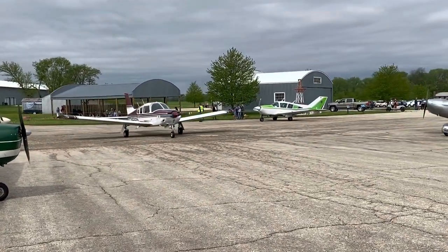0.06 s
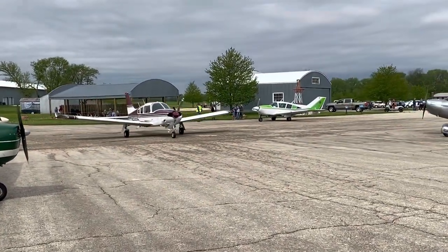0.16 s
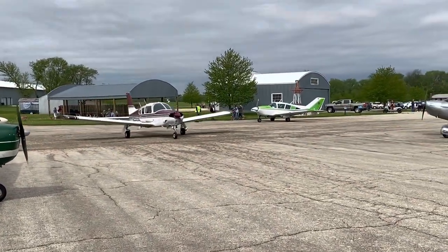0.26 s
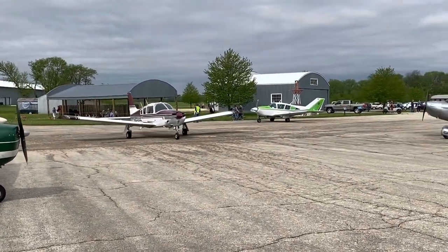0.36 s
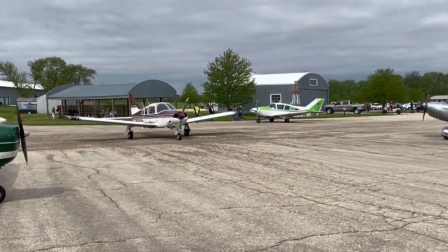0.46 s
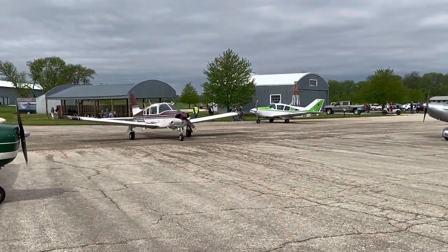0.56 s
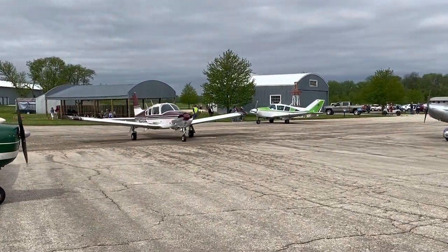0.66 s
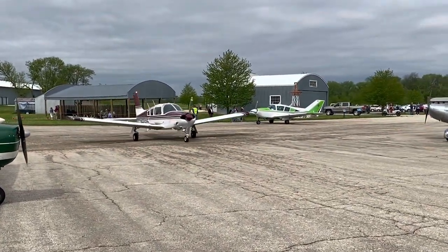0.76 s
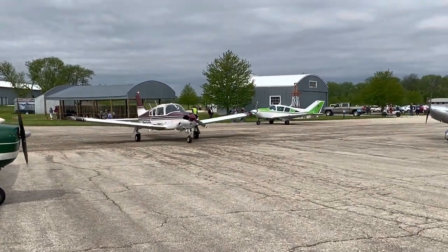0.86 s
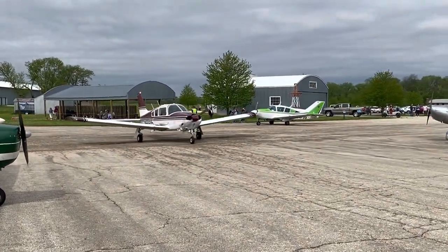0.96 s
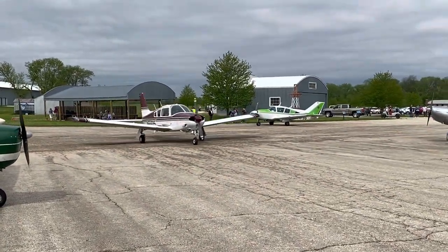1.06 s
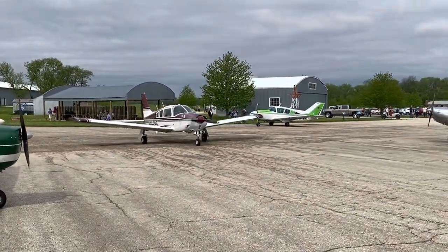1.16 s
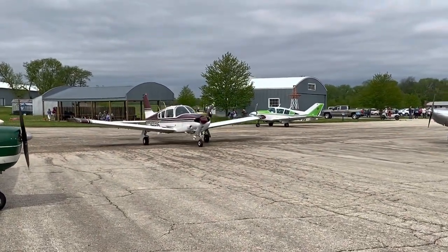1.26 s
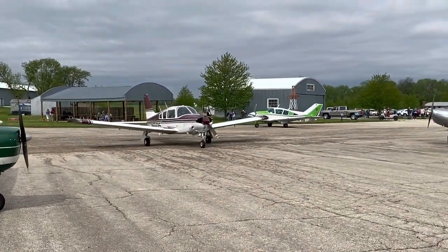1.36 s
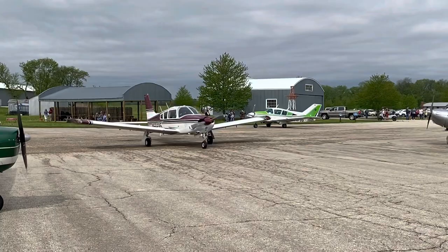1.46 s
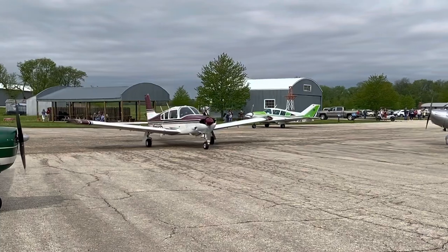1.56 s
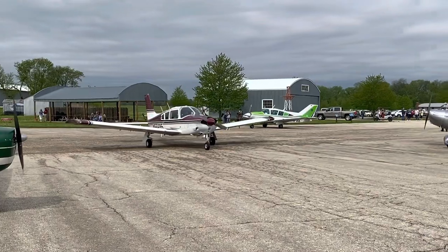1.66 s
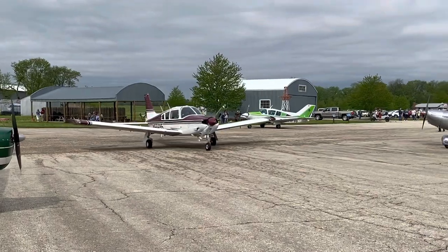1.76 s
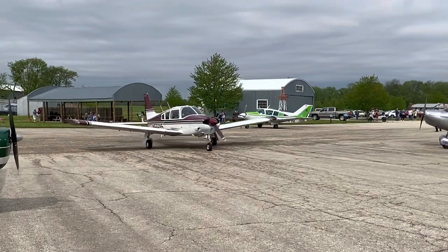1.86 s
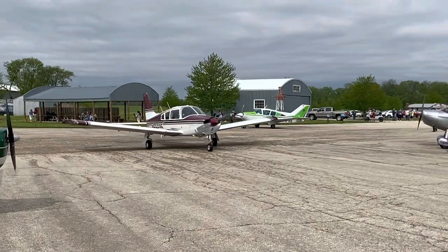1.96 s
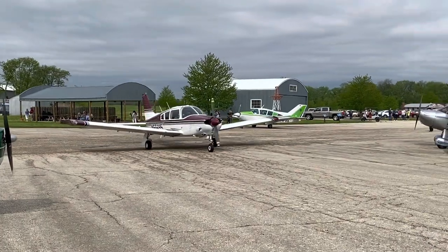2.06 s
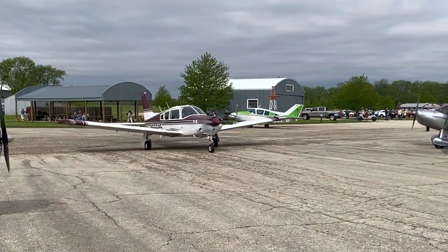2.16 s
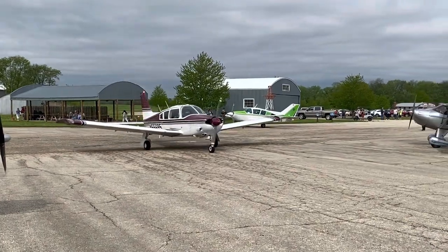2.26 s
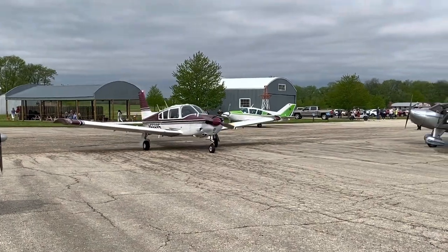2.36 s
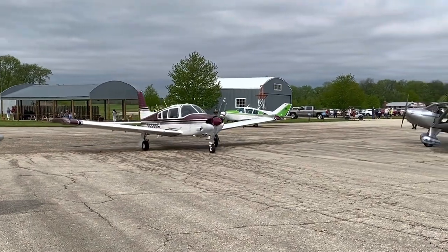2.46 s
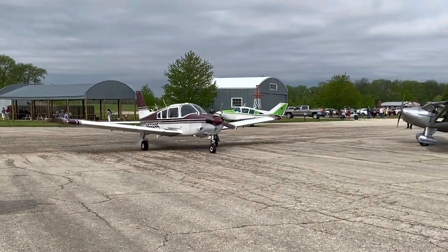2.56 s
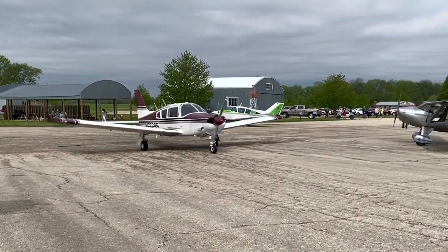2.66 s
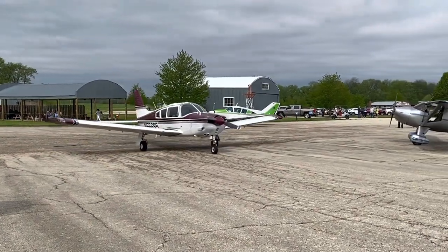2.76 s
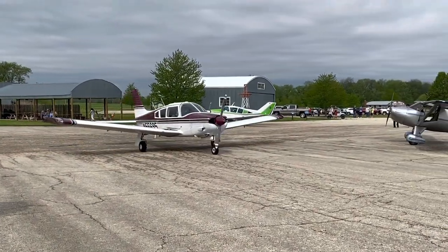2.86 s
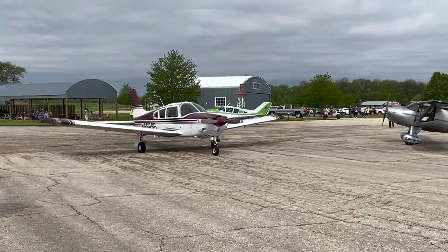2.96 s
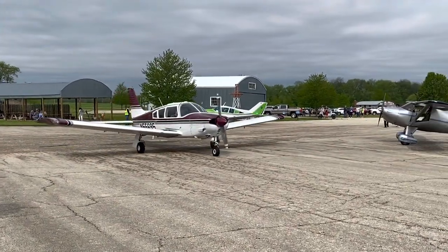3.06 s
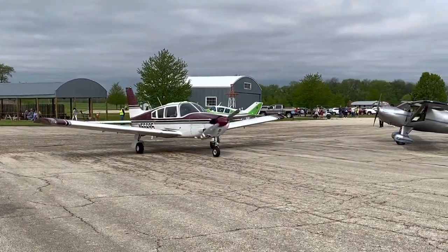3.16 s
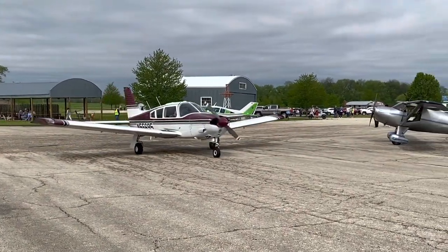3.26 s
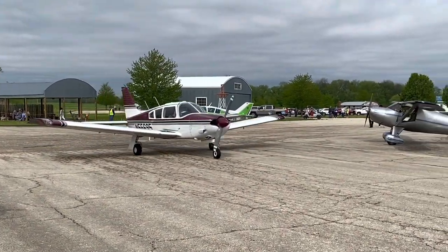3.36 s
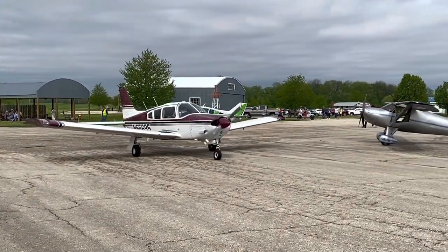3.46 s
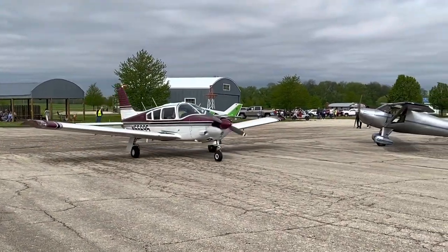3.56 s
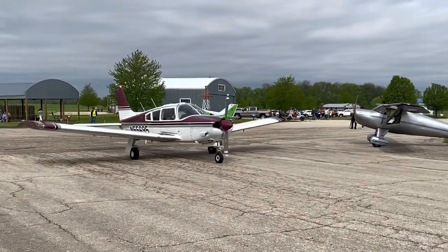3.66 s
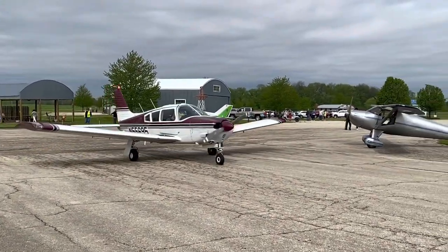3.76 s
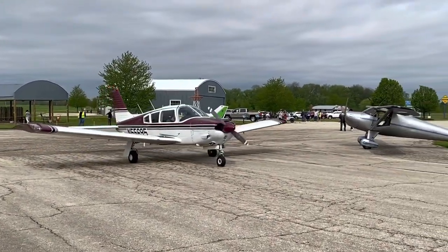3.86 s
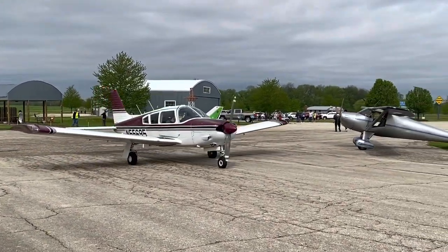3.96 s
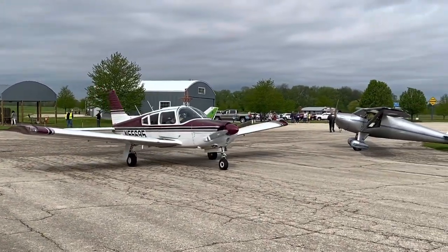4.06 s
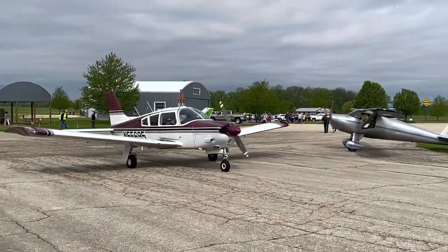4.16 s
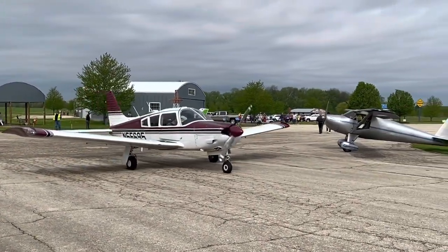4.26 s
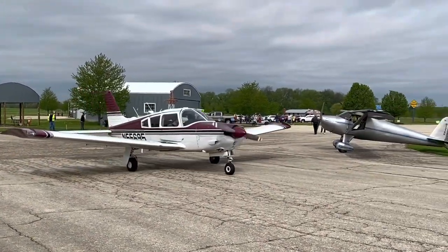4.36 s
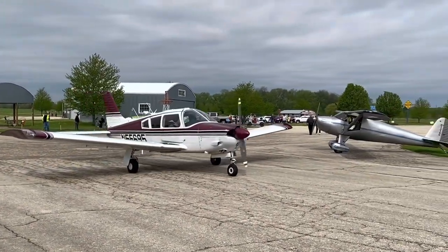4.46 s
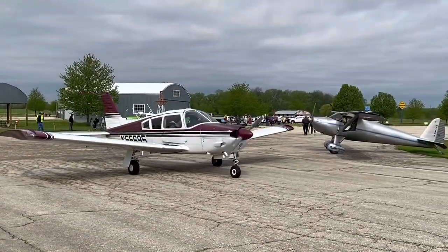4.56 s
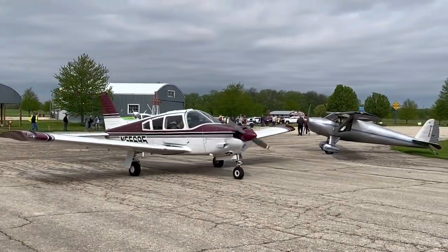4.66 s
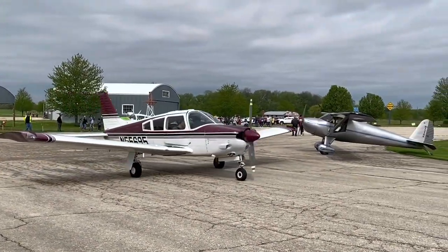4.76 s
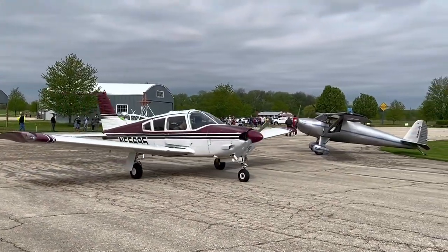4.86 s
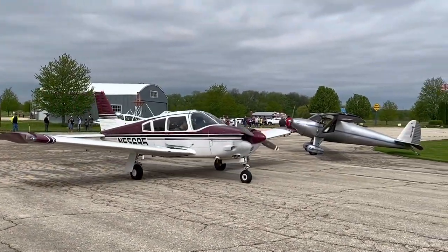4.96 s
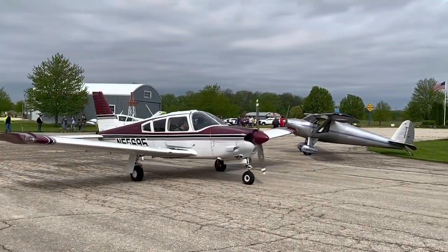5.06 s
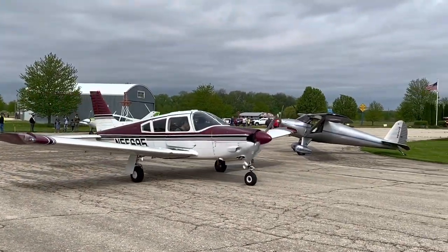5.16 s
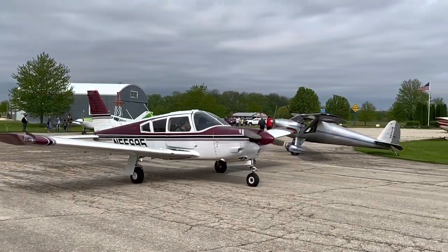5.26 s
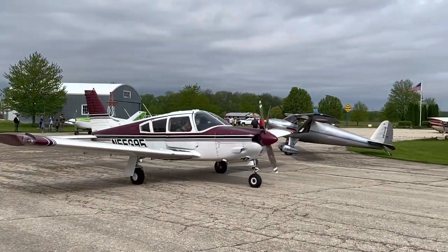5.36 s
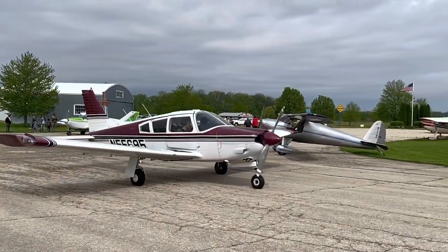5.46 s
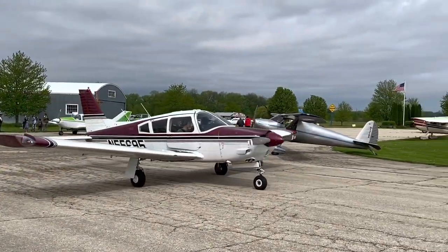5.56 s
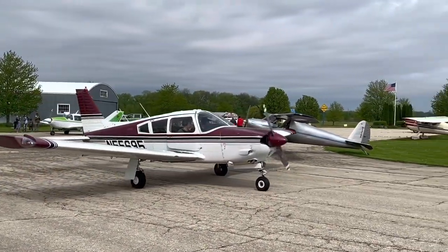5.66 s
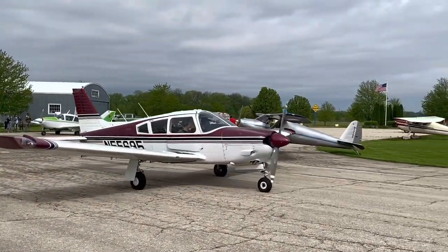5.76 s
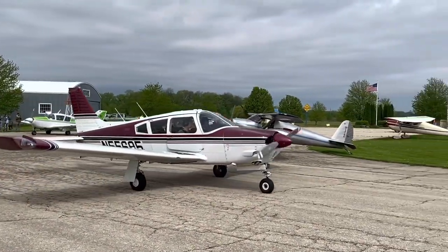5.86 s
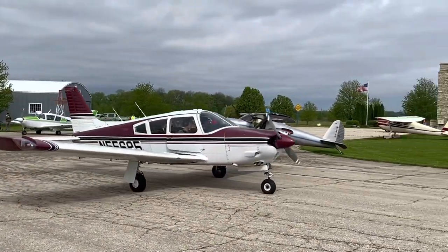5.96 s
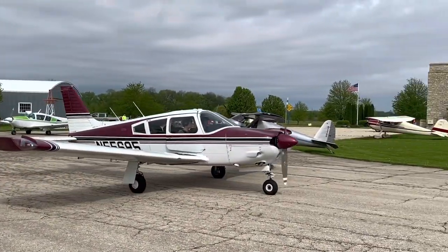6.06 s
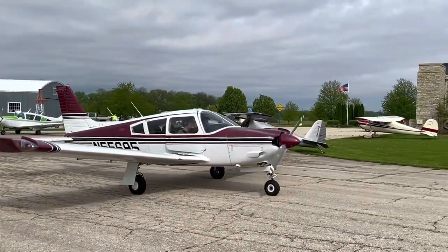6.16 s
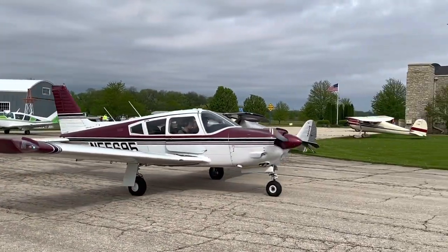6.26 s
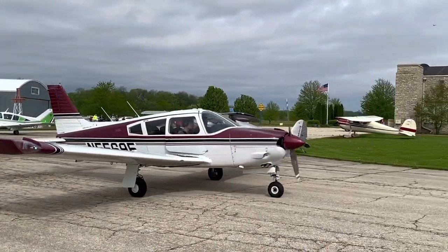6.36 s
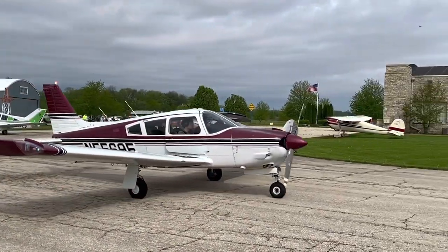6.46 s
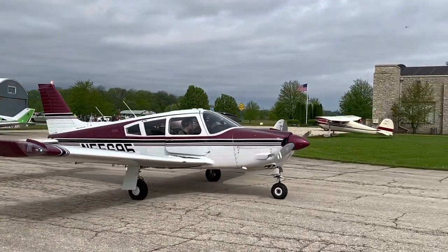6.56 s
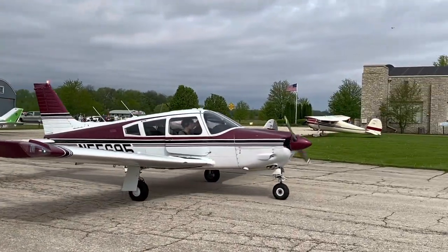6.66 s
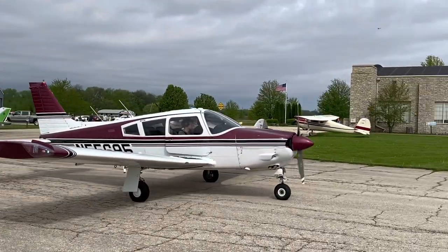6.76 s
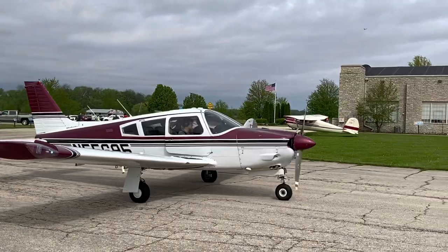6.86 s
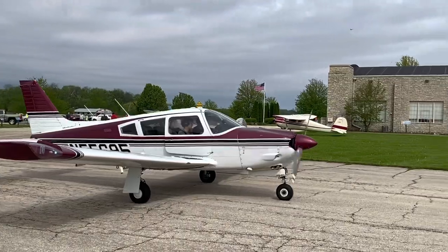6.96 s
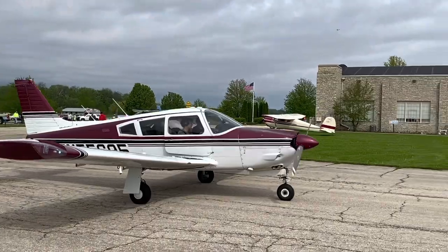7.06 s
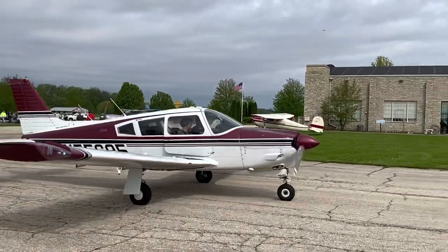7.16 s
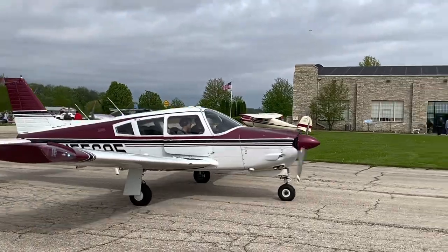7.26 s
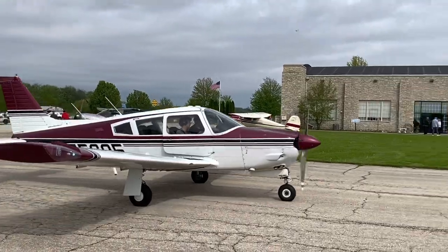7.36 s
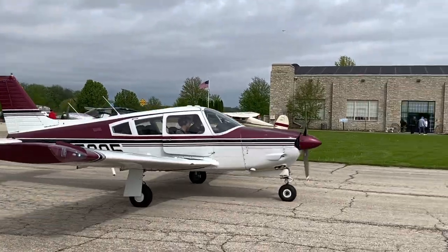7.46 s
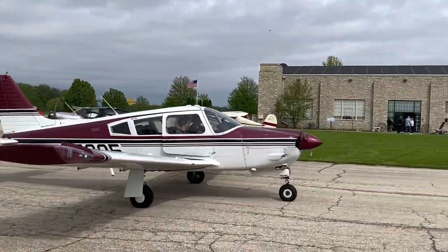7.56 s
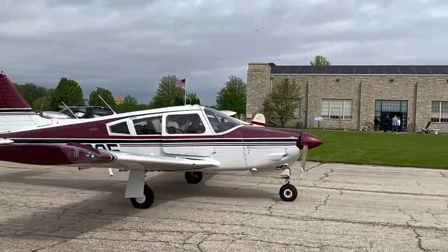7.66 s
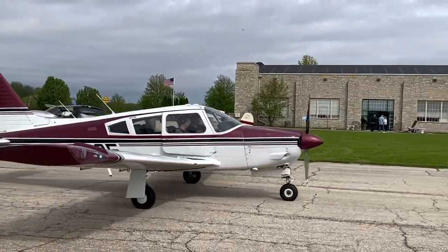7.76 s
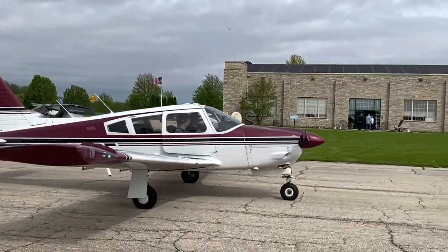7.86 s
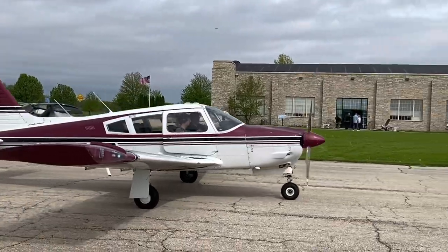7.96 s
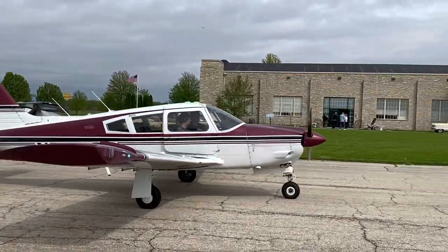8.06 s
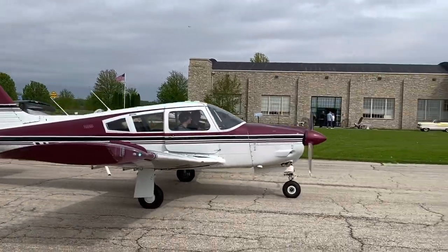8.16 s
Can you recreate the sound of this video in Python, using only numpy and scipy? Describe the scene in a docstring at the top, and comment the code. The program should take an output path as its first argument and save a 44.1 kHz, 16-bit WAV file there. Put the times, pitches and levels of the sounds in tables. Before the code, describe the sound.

A small propeller plane taxis closer over open pavement, its four-cylinder engine idling in a deep, uneven putter with a humming drone and fluttering blade wash. Wind rumbles on the handheld stereo microphone, then thumps hard around three to five seconds while the low engine note sinks. Near the end the engine speeds up and its exhaust turns sharp, crisp and spitting, close by.

```python
"""A light airplane's four-cylinder engine idles with a loping exhaust, nears, and then picks up speed.
Exhaust pulses pass through a muffler colour; ringing booms make the putter and sine tones the drone.
Each passing blade swells the noise of churned air, and jets of noise spit sharply as the outlet swings into line.
Wind, made of coloured noise and short pressure kicks, rumbles and thumps on the microphone throughout."""
import sys
import numpy as np
from scipy import signal
from scipy.fft import rfft, irfft, next_fast_len
from scipy.io import wavfile
from scipy.ndimage import uniform_filter1d, minimum_filter1d

SR = 44100
rng = np.random.default_rng(int(sys.argv[2]) if len(sys.argv) > 2 else 0)


def unload_audio(sound):
    """Save the sound as a 16-bit wav file, at the path given as the first command line argument."""
    columns = np.transpose(np.atleast_2d(sound))
    # keep every value between -1 and 1, then stretch to whole-number steps
    steps = np.round(np.clip(columns, -1, 1) * 32767)
    wavfile.write(sys.argv[1], SR, steps.astype(np.int16))


N = 362281
PADDED = next_fast_len(N + SR // 2, True)   # room for echoes in the filters
TIME, HZ = np.arange(N) / SR, np.arange(PADDED // 2 + 1) * SR / PADDED

# engine speed; the two-blade propeller passes at the same rate: time_s, firing_rate_hz
ENGINE_SPEED = [(0.0, 33.49), (0.8, 33.9), (1.6, 34.15), (2.2, 34.66), (2.8, 35.42), (3.4, 36.52),
                (4.2, 36.17), (5.0, 37.0), (6.4, 37.18), (6.7, 37.4), (7.0, 38.53), (7.3, 40.78),
                (7.6, 42.65), (7.9, 43.92), (8.22, 44.57)]
# places of the exhaust pulses in one engine cycle, uneven so the beat limps: place_cycles [0-1], level_db
CYLINDER_PULSES = [(.025, -3), (.25, -7), (.505, -7), (.77, 0)]
# tone of the exhaust through the muffler: frequency_hz, level_db [per Hz]
MUFFLER_COLOUR = [(30, -63), (55, 5), (90, 10.5), (140, 7), (200, -2), (280, -4), (335, 2), (385, -10),
                  (450, -11.5), (550, -5.5), (670, -9), (850, -15.5), (1100, -18.5), (1500, -38.5),
                  (2500, -46)]
# exhaust overtones that stand out: multiple [of the engine cycle rate], level_db
EXHAUST_OVERTONES = [(19, -7), (27, -11.5), (29, -17), (59, -21.5), (67, -25), (71, -48), (75, -21.5)]
# pipes that boom once a cycle: place_cycles [0-1], pitch_hz, level_db, swell_s, throttle_change_db
BOOMING_PIPES = [(0.298, 230.8, -8.5, 0.0092, -6), (0.566, 268.4, -4.5, 0.0063, -6),
                 (0.758, 177, -12, 0.01, -4), (.81, 300, -12, 0.015, -4)]
# hummed lines: multiple [of the firing rate], idle_level_db, throttle_change_db, before_build_change_db
DRONE_LINES = [(2, -12.5, 0, -24), (3, -20.5, 4.5, -23), (4, -17.5, -6, -3), (5, -22, -3, -2)]
# each cylinder's jet of gas: place_cycles [0-1], level_db
GAS_JETS = [(.186, -1.3), (.443, 0), (.691, -.7), (.951, 3.8)]
# tone of the spitting gas: frequency_hz, level_db [per Hz]
SPIT_COLOUR = [(400, 24.5), (850, 6), (1100, 7), (1280, 18.5), (1600, 2), (1950, 10.5), (2250, 5.5),
               (2550, -11.5), (3000, 4), (3500, -3), (4450, 1.5), (5600, 1), (6600, -1.5), (7600, -7.5),
               (11500, -8.5), (16000, -11)]
# ringing modes of the outlet's thin metal: pitch_hz, t60_s, level_db
OUTLET_MODES = [(3781, .024, -2), (4463, .02, 0), (4862, .026, -1), (6650, .012, -1), (11500, .015, -10)]
# tones of the propeller's rush, hiss and deeper wash: frequency_hz, level_db [per Hz]
RUSH_COLOUR = [(600, 8), (850, -2), (1050, 6), (1260, 4), (1480, 0.5), (1720, 2.5), (1950, 0), (2250, -2.5),
               (2600, -15.5), (5000, -52.5)]
HISS_COLOUR = [(1500, 3.5), (2500, 2), (3000, 5.5), (4200, 2), (5050, 4), (5600, 1), (6600, 0), (8000, -3),
               (9500, -9), (12300, -4.5), (16000, -14)]
WASH_COLOUR = [(300, -16), (580, 11.5), (850, -6), (1200, -24)]
# wind strength on the microphone: time_s, strength_db
WIND_STRENGTH = [(0, -31), (0.6, -31), (1.1, -28.5), (1.6, -31), (1.9, -31), (2.9, -30), (3.25, -26),
                 (3.6, -25), (3.95, -22.5), (4.12, -32.5), (4.7, -30), (5.5, -32), (5.9, -31.5),
                 (6.5, -31.5), (7.25, -28), (7.75, -29.5), (8.21, -25)]
# tones of the wind's rumble, buffeting and flutter: frequency_hz, level_db [per Hz]
RUMBLE_COLOUR = [(15, -30.5), (28, -33), (48, -6.5), (70, -2), (110, -5), (170, -12.5), (300, -18.5),
                 (600, -46.5)]
BUFFET_COLOUR = [(60, -7), (150, -5), (280, 3), (500, -7.5), (750, -14), (1100, -43.5), (2000, -54)]
FLUTTER_COLOUR = [(250, -12), (500, 7.5), (800, 1.5), (1050, -3.5), (1400, -22), (2400, -21.5)]
# strongest eddies that thump on the microphone: start_s [moment of the kick], peak_db, centre_hz
STRONG_THUMPS = [(1.766, -14, 490.0), (2.322, -14, 490.0), (2.425, -13, 400.0), (2.58, -9, 360.0),
                 (2.849, -12, 450.0), (3.116, -6, 390.0), (3.143, -6, 400.0), (3.225, -10, 490.0),
                 (3.308, -7, 400.0), (3.385, -7, 470.0), (3.441, -6, 460.0), (3.53, -7, 420.0),
                 (3.577, -6, 460.0), (3.593, -6, 450.0), (3.649, -6, 420.0), (3.664, 0, 400.0),
                 (3.765, -5, 460.0), (3.788, -7, 430.0), (3.862, -5, 440.0), (3.909, -4, 510.0),
                 (3.971, 1, 480.0), (4.016, -6, 470.0), (4.028, -12, 650.0), (4.208, -10, 580.0),
                 (4.254, -13, 630.0), (4.268, -13, 580.0), (4.28, -14, 620.0), (4.312, -14, 650.0),
                 (4.454, -10, 480.0), (4.481, -11, 520.0), (4.495, -10, 520.0), (4.536, -9, 620.0),
                 (4.64, -5, 480.0), (4.733, -12, 900.0), (4.759, -9, 810.0), (4.776, -11, 600.0),
                 (4.79, -11, 730.0), (4.826, -11, 830.0), (4.901, -11, 940.0), (4.955, -14, 940.0),
                 (4.976, -11, 490.0), (5.077, -14, 660.0), (5.097, -14, 570.0), (5.195, -12, 500.0),
                 (5.306, -10, 730.0), (5.504, -13, 700.0), (5.632, -12, 440.0), (5.723, -13, 480.0),
                 (5.817, -14, 530.0), (5.832, -9, 430.0), (6.01, -10, 530.0), (6.059, -8, 420.0),
                 (6.106, -14, 690.0), (6.371, -7, 560.0)]
# broader puffs of wind: centre_s, level_db, half_length_s, lowest_hz, highest_hz
WIND_PUFFS = [(0.898, -11.5, 0.013, 75, 159), (1.784, -35, 0.035, 460, 990),
              (1.938, -21.5, .025, 60.7, 281), (2.412, -26, 0.0073, 120, 500),
              (3.227, -21.5, 0.023, 200, 947), (3.586, -9.5, 0.015, 125, 574),
              (3.664, -9.5, 0.015, 148, 795), (3.855, -13, 0.03, 110, 503), (3.97, -14, .005, 300, 750),
              (4.024, -20, 0.013, 280, 880), (4.316, -25.5, 0.012, 600, 1190), (4.651, -21, 0.02, 149, 750),
              (4.77, -25, .028, 595, 1290), (4.83, -31, 0.02, 593, 1190), (4.902, -26, 0.015, 650, 1220),
              (4.954, -34, .018, 696, 1130), (5.212, -28, 0.0085, 147, 586),
              (5.844, -21, 0.032, 127.4, 540), (6.371, -23, 0.0083, 206, 910)]
# tone of the tick: frequency_hz, level_db [per Hz]
TICK_COLOUR = [(2600, -9), (3300, 3), (4400, 0), (6500, -8)]
# phase between the stereo microphone's sides in the high treble: frequency_hz, turn_cycles
MIC_PHASE_TURN = [(7400, 0), (10500, 1), (11600, 1), (14600, 2)]

# straight-line taxi; the plane's levels below hold at the closest point
TAXI_M_PER_S, CLOSEST_M, CLOSEST_S = 5.6, 9, 7.81
# exhaust level at idle, its change with the throttle open, and the purr's change before it builds up
EXHAUST_DB, EXHAUST_THROTTLE_DB, PURR_START_DB = -10, -10, -1
DRONE_BUILT_S, DRONE_BUILD_S = 0.73, 0.5   # moment the build-up ends, and its length
# the low engine note sinks for a while; the drone comes back in less time than the purr
DIP_START_S, DIP_FALL_S, DIP_HOLD_S, DIP_RISE_S, DRONE_RETURN_S = 3.676, 0.21, 2.11, 1, 0.94
DIP_DB, PUTTER_DIP_DB = -13, -12.5
# the outlet swings into line and slowly away; out of line its spit is faint
SPIT_START_S, SPIT_RISE_S, SPIT_FADE_DB_PER_S = 6.55, 0.95, 6
SPIT_DB, SPIT_FAR_DB, CLATTER_DB = -22.3, -43, -13   # clatter is relative to the jets
BLADE_PLACE = 0.41   # swish peak, as a share of the firing interval
SIDE_ON_HISS_DB = -4.5   # propeller hiss thins a little as the plane turns side-on
# wind layers: level in a breeze of BREEZE_DB, and dB of change per dB of wind
BREEZE_DB = -30
RUMBLE_DB, RUMBLE_FOLLOWS = -15.5, 0.93
BUFFET_DB, BUFFET_FOLLOWS = -27.5, 1.63
FLUTTER_DB, FLUTTER_FOLLOWS = -38.5, 0.29
# the wind noise sounds thinner and brighter: more flutter for a spell, less rumble from then on
THIN_START_S, THIN_RISE_S, THIN_HOLD_S, THIN_FALL_S = 3.71, 0.13, 1, 0.96
THIN_FLUTTER_DB, THIN_RUMBLE_DB = 6.5, -2.5
# until the wind picks up, everything above its deepest rumble is held down
CALM_UNTIL_S, PICK_UP_S, CALM_HZ, CALM_DB = 1.55, .22, 115, -15
# lesser eddies: EDDY_DB is over the breeze; the thin-sounding spell has them higher in pitch and level
EDDIES_PER_S, EDDY_DB, EDDY_FOLLOWS = 24, 2.5, 0.38
EDDY_HZ, EDDY_SPREAD_OCTAVES, THIN_EDDY_OCTAVES, THIN_EDDY_DB = 378, 0.23, 0.56, 5
WAKE_DB, WAKE_HZ, WAKE_S = -7.5, 148, 0.0041   # slower swing behind each thump
TICK_S, TICK_DB, TICK_HALF_S = 2.674, -31, .005
CUTOFF_HZ = 15900


def from_db(db):
    """Decibels to gain."""
    return 10 ** (np.asarray(db) / 20)


def rms_one(x):
    """Scale to unit power."""
    return x / np.sqrt(np.mean(x ** 2) + 1e-20)


def in_time(rows):
    """Each column of a curve at every sample."""
    s, *columns = np.transpose(rows)
    return [np.interp(TIME, s, c) for c in columns]


def swell(start_s, attack_s, hold_s, release_s):
    """Attack, hold and release, from 0 to 1 and back."""
    return np.interp(TIME, np.cumsum([start_s, attack_s, hold_s, release_s]), [0, 1, 1, 0])


def bell(age, half_s):
    """A smooth hump around age zero."""
    return np.exp(-np.minimum((age / half_s) ** 2, 20))


def coloured(x, points):
    """Causal (minimum-phase) filter with the given spectrum and skirts of 24 dB per octave outside it."""
    size = next_fast_len(N + SR // 2, True) // 2 * 2
    hz, db = np.transpose(points)
    bins = np.maximum(np.arange(size // 2 + 1) * SR / size, 1)
    octaves_above = np.maximum(np.log2(bins / hz[-1]), 0)
    octaves_below = np.maximum(np.log2(hz[0] / bins), 0)
    level_db = np.interp(np.log(bins), np.log(hz), db) - 24 * (octaves_above + octaves_below)
    # folding the cepstrum onto positive time gives the minimum phase
    cepstrum = irfft(np.log(from_db(level_db)))
    cepstrum[1:size // 2] *= 2
    cepstrum[size // 2 + 1:] = 0
    return irfft(rfft(x, size) * np.exp(rfft(cepstrum)))[..., :N]


def drift(rate):
    """Slow chance with spread 1: noise through a two-pole lowpass at rate Hz, made at every 40th sample."""
    r = np.exp(-80 * np.pi * rate / SR)
    noise = rng.standard_normal(N // 40 + 2002)
    slow = signal.lfilter([1], [1, -2 * r, r * r], noise)[2000:]   # skip the filter's start
    return np.interp(np.arange(N) / 40, np.arange(len(slow)), rms_one(slow))


def air(side_db):
    """White stereo noise, mostly shared by both sides."""
    mid, side = rng.standard_normal((2, N))
    return mid + from_db(side_db) * side * [[1], [-1]]


def nearness():
    """Sound pressure falls with distance; 1 at the closest point."""
    return CLOSEST_M / np.hypot(CLOSEST_M, TAXI_M_PER_S * (TIME - CLOSEST_S))


def unbuilt():
    """Falls from 1 to 0 while the low engine note builds up."""
    return np.clip((DRONE_BUILT_S - TIME) / DRONE_BUILD_S, 0, 1)


def exhaust(cycle, throttle, uneven_db, jitter_s, gas_db, puff_s):
    """Each cylinder sends a pulse and a puff of rough gas through the muffler, with steady overtones on top."""
    clicks = np.zeros(N)
    for place, db in CYLINDER_PULSES:
        turns = np.arange(int(cycle[-1]) + 1) + place
        chance = rng.standard_normal((len(turns), 2))
        moments_s = np.interp(turns, cycle, TIME, right=np.inf) + jitter_s * chance[:, 0]
        at = (moments_s * SR).clip(0, N).astype(int)
        heard = at < N
        clicks[at[heard]] += from_db(db + uneven_db * chance[:, 1])[heard]
    gas_level = signal.lfilter([1], [1, -np.exp(-1 / (puff_s * SR))], clicks + 1e-18)
    pulses = clicks + from_db(gas_db) * gas_level * rng.standard_normal(N)
    # echoes between pipes, airframe and ground smear each pulse around its moment without colouring it
    spectrum = rfft(pulses, PADDED)
    for delay_s, gain in [(.0047, -0.063), (.0131, 0.54), (.0211, 0.043), (.0437, 0.11)]:
        echo = np.exp(-2j * np.pi * HZ * delay_s)
        spectrum = spectrum * (1 - gain / echo) / (1 - gain * echo)
    purr = rms_one(coloured(irfft(spectrum, PADDED)[:N], MUFFLER_COLOUR))
    tones = sum(from_db(db) * overtone(cycle, round(order)) for order, db in EXHAUST_OVERTONES)
    level_db = EXHAUST_DB + EXHAUST_THROTTLE_DB * throttle + PURR_START_DB * unbuilt()
    return from_db(level_db) * (purr + tones)


def overtone(cycle, order):
    """One multiple of the engine cycle that stands out, wavering a little."""
    tone = np.sin(2 * np.pi * (order * cycle + rng.random()))
    return np.sqrt(2) * tone * from_db(2 * drift(0.17))


def putter(cycle, throttle, uneven_db):
    """Once a cycle each pipe is kicked into a short boom at its own pitch."""
    out, age = np.zeros(N), np.arange(SR // 10) / SR
    for place, hz, db, swell_s, throttle_db in BOOMING_PIPES:
        turns = np.arange(int(cycle[-1] - place) + 1) + place
        at = np.searchsorted(cycle, turns).clip(0, N - 1)
        kicks = np.zeros(N)
        kicks[at] = from_db(uneven_db * rng.standard_normal(len(turns)))
        boom = age / swell_s * np.exp(1 - age / swell_s) * np.sin(2 * np.pi * hz * age)
        out += from_db(db + throttle_db * throttle) * signal.oaconvolve(kicks, boom)[:N]
    return out


def drone(firing, throttle, waver_db, swell_db):
    """Exhaust and blades hum together on low multiples of the firing rate, building up at the start."""
    hum, early = np.zeros(N), unbuilt()
    for order, db, throttle_db, early_db in DRONE_LINES:
        level_db = db + throttle_db * throttle + early_db * early
        level_db = level_db + waver_db * drift(27) + swell_db * drift(3.2)
        tone = np.sin(2 * np.pi * (round(order) * firing + rng.random()))
        hum += np.sqrt(2) * from_db(level_db) * tone
    return hum


def spit(cycle, uneven_db, tint_db, crackle_db, trail_db):
    """Each firing shoots out a jet of gas: a broad slap, each a little different in colour, and a trail of hiss."""
    swell_cycles, trail_cycles = .032, .18
    edges_hz = [400, 1150, 1600, 2500, 3700, 5600, 8500, 17000]
    jets = np.zeros((len(edges_hz) - 1, N))   # one envelope per band
    for place, db in GAS_JETS:
        stroke, since = np.divmod(cycle + 1 - place, 1)
        chance = rng.standard_normal((int(stroke[-1]) + 1, len(edges_hz))).clip(-2, 2).T
        strength = from_db(db + uneven_db * chance[0] + tint_db * chance[1:])[:, stroke.astype(int)]
        age = since / swell_cycles
        slap = (age * np.exp(1 - age)) ** 2
        trail = from_db(trail_db) * np.minimum(age, 1) * np.exp(-since / trail_cycles)
        jets += strength * (slap + trail)
    jets *= from_db(crackle_db * np.array([drift(126) for _ in jets]))
    gas = np.zeros(N)
    for low_hz, high_hz, jet in zip(edges_hz, edges_hz[1:], jets):
        band = signal.butter(2, (low_hz, high_hz), "band", fs=SR, output="sos")
        gas += signal.sosfilt(band, rng.standard_normal(N) * jet)
    return outlet_aim() * (rms_one(coloured(gas, SPIT_COLOUR)) + from_db(CLATTER_DB) * clatter(gas))


def clatter(gas):
    """The thin metal of the outlet rings with the gas that strikes it."""
    out = np.zeros(N)
    for hz, t60, db in OUTLET_MODES:
        r, w = from_db(-60 / (t60 * SR)), 2 * np.pi * hz / SR
        ring = signal.lfilter([1], [1, -2 * r * np.cos(w), r * r], gas)
        out += from_db(db) * rms_one(ring)
    return rms_one(out)


def outlet_aim():
    """Gain of the spit as the exhaust outlet turns toward the listener and away."""
    since = TIME - SPIT_START_S
    rise = np.sin(np.pi / 2 * np.clip(since / SPIT_RISE_S, 0, 1))
    fade = from_db(-SPIT_FADE_DB_PER_S * np.maximum(since - SPIT_RISE_S, 0))
    return from_db(SPIT_FAR_DB) + from_db(SPIT_DB) * rise * fade


def propeller(firing, rush_db, wash_db, hiss_db, swish, flutter_db, lean_db):
    """Churned air swishes with every blade; its rush leans right, and a deeper wash is heard close by."""
    blades = 1 + swish * np.cos(2 * np.pi * (firing - BLADE_PLACE))
    beat = rms_one(blades * from_db(flutter_db * drift(78)))
    rush_air = air(-18) * from_db(lean_db * np.array([[-1], [1]]))
    hiss_air = rng.standard_normal(N)
    near = nearness()
    wash = from_db(wash_db) * near * rms_one(coloured(air(-6), WASH_COLOUR))
    rush = from_db(rush_db) * rms_one(coloured(rush_air, RUSH_COLOUR))
    hiss = from_db(hiss_db + SIDE_ON_HISS_DB * near ** 2) * rms_one(coloured(hiss_air, HISS_COLOUR))
    return (wash + rush + hiss) * beat


def thumps(rows, lean_db, tatter_db, tatter_s):
    """An eddy gives the microphone one sharp push or pull, uneven between sides, then swings back and breaks up."""
    reach = SR // 25
    out, tatters, age = np.zeros((2, N)), np.zeros(N), np.arange(-reach, reach) / SR
    after = np.maximum(age, 0)
    wake_shape = after / WAKE_S * np.exp(1 - after / WAKE_S)
    wake = from_db(WAKE_DB) * wake_shape * np.sin(2 * np.pi * WAKE_HZ * after)
    for (s, db, hz), (lean, way) in zip(rows, rng.standard_normal((len(rows), 2))):
        at = round(s * SR)
        if reach <= at < N - reach:
            spread = (np.pi * hz * age) ** 2
            push = (1 - 2 * spread) * np.exp(-np.minimum(spread, 20))
            kick = np.sign(way) * (push - wake)
            span = slice(at - reach, at + reach)
            out[:, span] += from_db(db + lean_db * lean * np.array([[1], [-1]])) * kick
            tatters[span] += from_db(db + tatter_db) * np.exp(-after / tatter_s) * (age > 0)
    return out + tatters * rms_one(coloured(air(-18.5), FLUTTER_COLOUR))


def eddies(strength_db, count=330):
    """Random lesser eddies (start_s, peak_db, centre_hz); while the wind noise sounds thin, stronger and sharper."""
    times = np.cumsum(rng.exponential(1, count)) / EDDIES_PER_S
    size = rng.standard_normal(count).clip(-2, 2)
    thin = np.interp(times, TIME, swell(THIN_START_S, THIN_RISE_S, THIN_HOLD_S, THIN_FALL_S))
    gust_db = np.interp(times, TIME, strength_db) - BREEZE_DB
    peaks_db = BREEZE_DB + EDDY_FOLLOWS * gust_db + EDDY_DB + THIN_EDDY_DB * thin
    centres_hz = EDDY_HZ * 2 ** (EDDY_SPREAD_OCTAVES * size + THIN_EDDY_OCTAVES * thin)
    return np.column_stack([times, peaks_db, centres_hz])


def puffs():
    """Each puff is a short swell of rough air in its own range of pitch."""
    out, reach = np.zeros((2, N)), SR // 10
    age = np.arange(-reach, reach) / SR
    for s, db, half_s, low_hz, high_hz in WIND_PUFFS:
        at = round(s * SR)
        band = signal.butter(2, [low_hz, high_hz], "band", fs=SR, output="sos")
        noise = rng.standard_normal((2, 2 * reach))
        mid, side = signal.sosfilt(band, signal.sosfilt(band, noise))   # twice for steeper edges
        shape = bell(age, half_s)
        stereo = mid + from_db(-11.5) * side * [[1], [-1]]
        puff = rms_one(stereo * shape) * np.sqrt(np.mean(shape ** 2))
        out[:, at - reach:at + reach] += from_db(db) * puff
    return out


def wind(strength_db, lumpy_db, gusty_db):
    """A soft rumble, with rougher buffeting and a lighter flutter in clumps; all grow with the wind."""
    gust_db = strength_db - BREEZE_DB
    thin = swell(THIN_START_S, THIN_RISE_S, THIN_HOLD_S, THIN_FALL_S)
    thinned = np.maximum.accumulate(thin)   # stays up once risen
    clumps = from_db(gusty_db * np.tanh(drift(66) / 2) * 2)
    rumble = rms_one(coloured(air(-14.0) * from_db(lumpy_db * drift(6.6)), RUMBLE_COLOUR))
    buffet = rms_one(coloured(air(-6.0) * clumps, BUFFET_COLOUR))
    flutter = rms_one(coloured(air(-19.0) * clumps, FLUTTER_COLOUR))
    return (from_db(RUMBLE_DB + RUMBLE_FOLLOWS * gust_db + THIN_RUMBLE_DB * thinned) * rumble
            + from_db(BUFFET_DB + BUFFET_FOLLOWS * gust_db) * buffet
            + from_db(FLUTTER_DB + FLUTTER_FOLLOWS * gust_db + THIN_FLUTTER_DB * thin) * flutter)


def calmed(gusts):
    """Light air mostly rumbles; the rougher buffeting comes in as the wind picks up."""
    deep = signal.sosfiltfilt(signal.butter(2, CALM_HZ, fs=SR, output="sos"), gusts)
    calm = np.clip(1 - (TIME - CALM_UNTIL_S) / PICK_UP_S, 0, 1)
    return deep + from_db(CALM_DB * calm) * (gusts - deep)


def tick():
    """A lone, faint, short tick of bright noise."""
    noise = rms_one(coloured(rng.standard_normal(N), TICK_COLOUR))
    return from_db(TICK_DB) * bell(TIME - TICK_S, TICK_HALF_S) * noise


def scene():
    """The crankshaft drives every engine and propeller layer, scaled by nearness; the wind blows on its own."""
    speed, = in_time(ENGINE_SPEED)
    throttle = (speed - speed.min()) / np.ptp(speed)   # 0 at idle, 1 at the fastest
    firing = np.cumsum(speed) / SR
    cycle = firing / len(CYLINDER_PULSES)
    purr = exhaust(cycle, throttle, uneven_db=0.7, jitter_s=.00005, gas_db=-41, puff_s=0.03)
    booms = putter(cycle, throttle, uneven_db=1)
    hum = drone(firing, throttle, waver_db=2.24, swell_db=1.24)
    jets = spit(cycle, uneven_db=1.5, tint_db=2.4, crackle_db=2, trail_db=-12)
    blades = propeller(firing, rush_db=-27.5, wash_db=-34, hiss_db=-30.5,
                       swish=0.14, flutter_db=1.14, lean_db=1.45)
    sunk = swell(DIP_START_S, DIP_FALL_S, DIP_HOLD_S, DIP_RISE_S)
    hum_sunk = swell(DIP_START_S, DIP_FALL_S, DIP_HOLD_S, DRONE_RETURN_S)
    low_note = from_db(DIP_DB * sunk) * purr + from_db(DIP_DB * hum_sunk) * hum
    engine = low_note + from_db(PUTTER_DIP_DB * sunk) * booms + jets
    plane = nearness() * (engine + blades)
    strength_db, = in_time(WIND_STRENGTH)
    knocks = thumps([*STRONG_THUMPS, *eddies(strength_db)], lean_db=3.0, tatter_db=-19, tatter_s=0.009)
    gusts = wind(strength_db, lumpy_db=1.0, gusty_db=8.5) + knocks
    return plane + calmed(gusts) + puffs() + tick()


def record(dry):
    """A limiter holds the loudest peaks, the sides part in phase in the treble, the top is cut."""
    ceiling, reach = .9, SR // 600
    needed = np.minimum(1, ceiling / (np.abs(dry).max(axis=0) + 1e-9))
    gain = minimum_filter1d(needed, 2 * reach)
    left, right = dry * uniform_filter1d(uniform_filter1d(gain, reach), reach)
    turn = np.exp(2j * np.pi * np.interp(HZ, *np.transpose(MIC_PHASE_TURN)))
    top = 1 / np.sqrt(1 + (HZ / CUTOFF_HZ) ** 300)
    sides = np.array([rfft(left, PADDED), rfft(right, PADDED) * turn])
    return irfft(sides * top, PADDED)[:, :N]


dry = scene()
out = record(dry)
unload_audio(out)
```